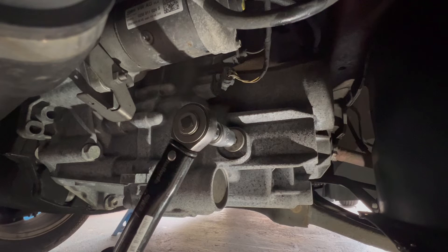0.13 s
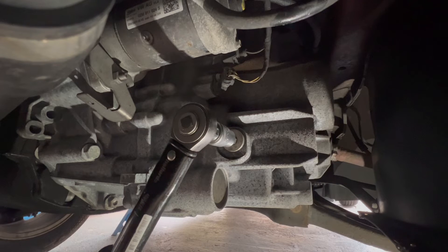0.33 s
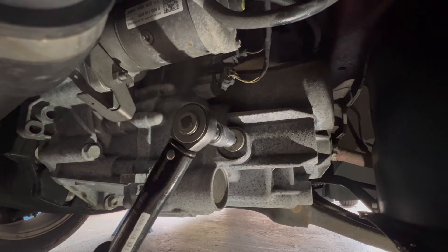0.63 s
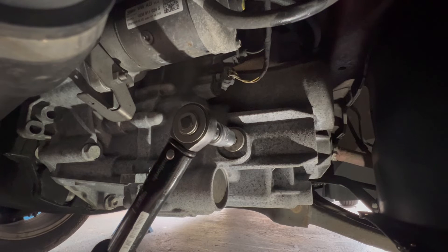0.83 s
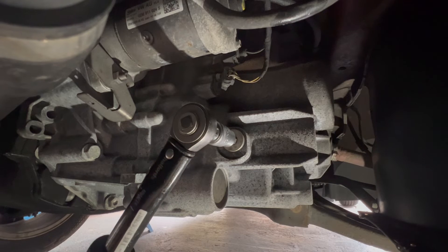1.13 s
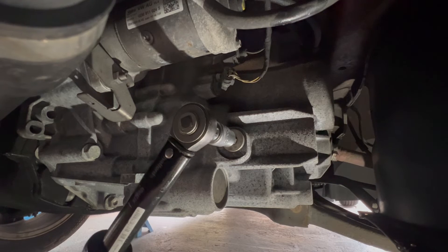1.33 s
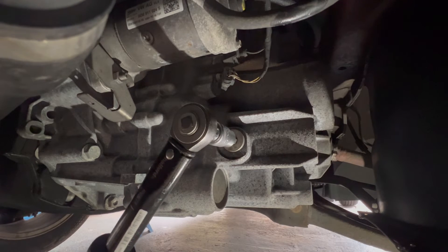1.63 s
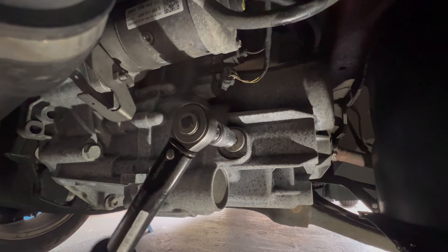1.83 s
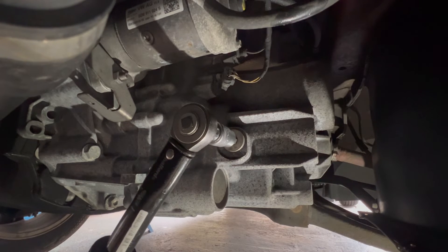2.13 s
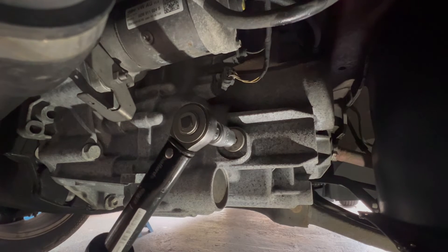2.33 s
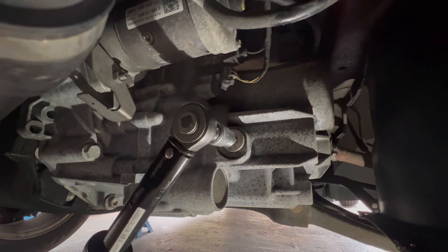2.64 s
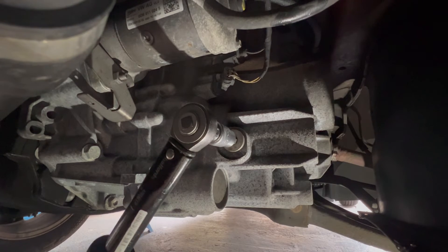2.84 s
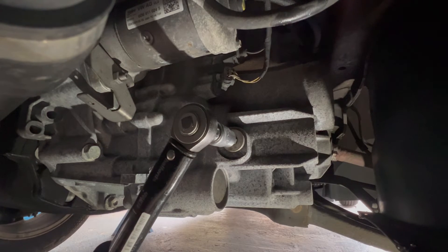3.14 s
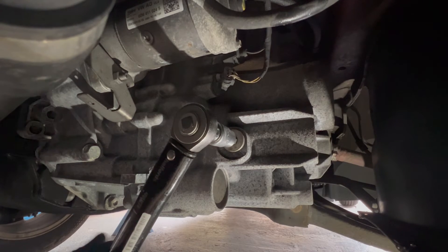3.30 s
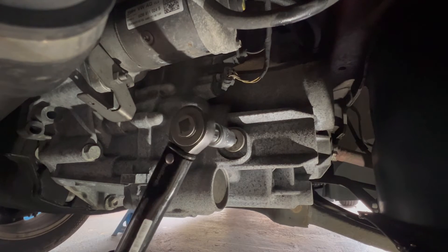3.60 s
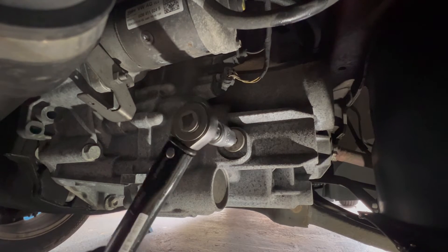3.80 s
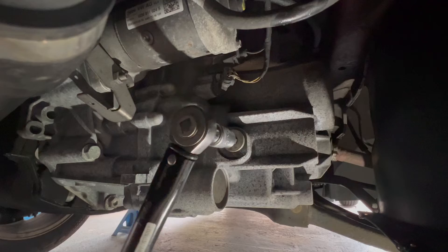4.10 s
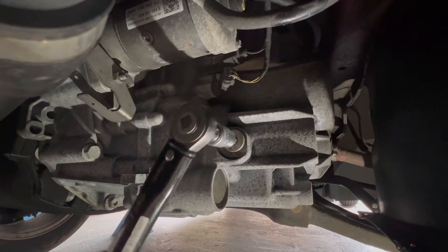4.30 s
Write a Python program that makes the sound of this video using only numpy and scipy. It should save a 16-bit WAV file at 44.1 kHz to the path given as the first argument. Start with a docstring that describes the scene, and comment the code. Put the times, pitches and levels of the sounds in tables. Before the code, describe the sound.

A torque wrench gives four sharp, ringing metal clicks, followed by light tool handling ticks, over a low garage hum.

```python
"""A click-type torque wrench breaks over and resets twice on a plug under a vehicle in a garage.
Each blow is a short rattle of steel that rings the bar and the underbody, then comes back to the
stereo microphone from floor and walls. Hand and sleeve tick and rub on the tool.
Behind them lie a low, lumpy hum and a band of distant hiss."""
import sys
import numpy as np
from scipy import signal
from scipy.fft import rfft, irfft
from scipy.io import wavfile
from scipy.ndimage import uniform_filter1d

SR = 44100
rng = np.random.default_rng(int(sys.argv[2]) if len(sys.argv) > 2 else 0)


def log_audio(samples):
    """Write samples as a 16-bit WAV file to the path given in sys.argv[1]."""
    # one column per channel
    frames = np.atleast_2d(samples).T
    # limit to full scale, then quantise
    limited = np.clip(frames, -1, 1)
    pcm = np.round(limited * 32767).astype(np.int16)
    wavfile.write(sys.argv[1], SR, pcm)


N = 196588

# Blows of the pawl, under the vehicle: start_s, rattle_db, is_reset (0 = break over), return_db
PAWL_BLOWS = [(1.2875, -18.5, 0, -20.5), (1.8451, -18.5, 1, -21), (2.3753, -18, 0, -20),
              (2.8758, -18.5, 1, -21.5)]


def wrench():
    """Each blow of the pawl rattles the head, rings the steel and sounds the garage."""
    out, t = np.zeros((2, N)), np.arange(SR // 2) / SR
    for start_s, rattle_db, is_reset, return_db in PAWL_BLOWS:
        add(out, start_s, gain_of(rattle_db) * head_rattle(t[:2048], is_reset))
        add(out, start_s, gain_of(return_db) * (steel_ring(t, is_reset) + garage_return(t, is_reset)))
    return out


# Colour of the break-over and of the reset at the microphone: freq_hz, left_db, right_db
BREAK_COLOUR = [(199.5, -71.5, -70), (448, -69, -51.5), (738, -78, -55), (1300, -46, -63),
                (2000, -46.5, -50.5), (2580, -51.5, -56), (3380, -43, -48), (5800, -51, -47),
                (7500, -47, -50), (9100, -53.5, -47.5), (11600, -41.5, -41.5), (13000, -39, -39.5),
                (16500, -46, -41)]
RESET_COLOUR = [(200, -87, -70.5), (450, -67, -58), (720, -64.5, -51.5), (1330, -53, -59.5),
                (1950, -50, -51), (2750, -52, -51.5), (3595, -50, -65), (5140, -53, -61), (6840, -52, -54),
                (9000, -51.5, -52.5), (11760, -36, -37), (12640, -60.5, -58), (15450, -44.5, -57)]


def head_rattle(t, is_reset, clack_db=-2.5, chatter_db=0.5):
    """Steel meets steel: a treble snap bounces once; the head's clack builds for 2 ms and dies."""
    colour = RESET_COLOUR if is_reset else BREAK_COLOUR
    chatter = gain_of(chatter_db * wander(1800, len(t)))
    noise = stereo_noise(len(t), lambda hz: read(colour, hz), chatter)
    low, high = split(noise, hz=7500)
    bounce = .45 * np.exp(-abs(t - .0022) / .0009)
    snap = np.exp(-t / .0009) + bounce + .15 * np.exp(-t / .004)
    clack = t / .0017 * np.exp(1 - t / .0017)
    attack = np.minimum(t / .0001, 1)
    return unit_rms(unit_rms(high * snap * attack) + gain_of(clack_db) * unit_rms(low * clack))


# Modes of the bar and the underbody above it, levels against the garage's return:
# pitch_hz, level_db, t60_s, left_minus_right_db, reset_change_db, right_lead_rad
STEEL_MODES = [(212.5, -5.5, 0.076, -1, -2.5, 0.56), (731, -14.5, 0.045, -12.5, 3, 1.66),
               (969, -18, 0.17, -5, -3, 1.35), (1219, -19.5, 0.072, -4, 4, 2.5),
               (1295, -11, 0.09, -6.5, 3, 1.3), (1423, -7.5, 0.04, -6, 2, 1.04),
               (1794, -17, .12, -4.5, 3, 1.76), (1845, -21, 0.34, -6, 5, 1.9),
               (1901, -14, 0.095, -7.5, 4.5, 1.63), (1987, -3.5, 0.018, -12, 4.5, 1.62),
               (2294, -15, 0.13, -1.5, 5.5, 0.91), (2610, -21, 0.14, -6, -0.5, 2.6),
               (3042, -10.5, 0.068, 0.5, 1, 1.4), (3500, -12, 0.095, -0.5, -1, 0.71),
               (3570, -3.5, 0.034, 7.5, -5, .8), (3970, -16, 0.13, -0.5, -5, 1.5),
               (4200, -14, .1, 5, -4.5, 0.89), (4500, -6, 0.049, 6, -2.5, 1.4),
               (4944, -14, .12, 5.5, -1, 0.9), (5140, -22.5, 0.1, 3.5, -3, 1.9),
               (5490, -4.5, 0.076, 1.5, -5.5, 1.2), (5850, -7, 0.062, 3.5, -4.5, 0.9)]


def steel_ring(t, is_reset):
    """Bar and underbody ring, each mode building over a few cycles; near surfaces echo them."""
    direct = np.zeros((2, len(t)))
    for hz, db, t60_s, pan_db, reset_db, lead_rad in STEEL_MODES:
        phase = np.array([[0], [lead_rad]]) + 2 * np.pi * rng.random()
        build = 1 - np.exp(-(t * hz / 1.72) ** 2)
        level_db = db + is_reset * reset_db - 60 * t / t60_s + [[pan_db / 2], [-pan_db / 2]]
        direct += gain_of(level_db) * build * np.sin(2 * np.pi * hz * t + phase)
    out = direct.copy()
    for delay_s, echo_db in [(.0105, 0.5), (.0138, -11), (.0185, -7)]:
        add(out, delay_s, gain_of(echo_db) * direct)
    return out


# Colour of what the garage sends back to the microphone: freq_hz, left_db, right_db
GARAGE_COLOUR = [(201.8, -57, -54), (580, -72, -68), (1310, -60.5, -60.5), (2010, -68.5, -54.5),
                 (2700, -58.5, -65), (3630, -64, -65), (5464, -59.5, -70.5), (7200, -65, -67),
                 (9000, -65, -66.5), (11200, -71, -70), (13080, -71.5, -68), (15400, -76.5, -86.5)]
# Decay of the garage by band: freq_hz, t60_s
GARAGE_DECAY = [(200, 0.14), (900, 0.18), (2000, 0.2), (4500, 0.3), (9000, 0.2), (15000, 0.25)]


def garage_return(t, is_reset):
    """Floor, underbody and walls return the blow: it swells, then each band dies at its own speed."""
    def colour(hz):  # the reset is a duller blow
        return read(GARAGE_COLOUR, hz) - is_reset * 7.6 * band(hz, centre_hz=5200)
    hz, frame_s, spectrum = signal.stft(stereo_noise(len(t), colour), SR, nperseg=256)
    lumps = unit_rms(uniform_filter1d(rng.standard_normal(spectrum.shape[1:]), 5, 0))  # uneven surfaces
    decay_db = 60 * frame_s / read(GARAGE_DECAY, hz).T
    tail = signal.istft(spectrum * gain_of(0.62 * lumps - decay_db), SR, nperseg=256)[1]
    swell = 1 - np.exp(-(t / .008) ** 2)
    return tail[:, :len(t)] * swell


# Handling of the tool: start_s, snap_db, knock_db, knock_hz, left_minus_right_db
HANDLING_TICKS = [(.4547, -51, -60, 4800, 2), (.506, -72, -52, 4420, 14), (0.543, -66, -52, 4700, 9),
                  (.8, -75, -42, 1170, 3), (0.9485, -72, -56.5, 4570, 9), (1.181, -59, -52, 4800, 5),
                  (2.309, -72, -57, 4570, 7), (2.7652, -69, -36, 1410, 4), (3.422, -66, -37, 2700, -2),
                  (3.445, -65, -42.5, 1290, -3), (3.5215, -49.5, -53, 4500, -2),
                  (3.525, -62, -38, 1170, -7), (3.743, -54, -48, 3800, 1), (3.783, -42, -57, 4000, -3),
                  (3.8255, -41.5, -52, 5000, 2), (3.8429, -37, -41, 870, -4.5), (3.850, -40, -47, 4500, 1),
                  (3.855, -45, -50, 4500, 7), (3.8874, -25.5, -26, 2920, 2), (3.962, -39.5, -42, 3560, 0),
                  (4.001, -39, -44.5, 3540, 1), (4.037, -47, -58, 5000, 0), (4.232, -62, -44, 800, 4),
                  (4.353, -60, -45, 1750, -10), (4.372, -47, -35.5, 1500, -4),
                  (4.4053, -30, -39, 4060, 0.5), (4.408, -60, -38.5, 1370, -4.5),
                  (4.444, -44, -46, 4000, 5), (4.448, -37, -41, 3520, -4)]
SNAP_HZ, SNAP_OCTAVES, SNAP_DECAY_S = 11450, 0.81, 0.0033
KNOCK_OCTAVES, KNOCK_DECAY_S = 0.63, 0.0036


def handling_ticks():
    """Each tick of the handled tool is a bright snap and a duller knock, with a faint return."""
    out, t = np.zeros((2, N)), np.arange(4096) / SR
    attack = np.minimum(t / 0.000067, 1)
    for start_s, snap_db, knock_db, knock_hz, pan_db in HANDLING_TICKS:
        snap = (snap_db, SNAP_HZ, SNAP_OCTAVES, SNAP_DECAY_S)
        knock = (knock_db, knock_hz, KNOCK_OCTAVES, KNOCK_DECAY_S)
        sides_db = np.array([[pan_db / 2], [-pan_db / 2]])
        for db, centre_hz, octaves, decay_s in (snap, knock):
            colour = lambda hz: np.maximum(-6 * (np.log2((hz + 1) / centre_hz) / octaves) ** 2, -60)
            decay = np.exp(-t / decay_s) + 0.087 * np.exp(-t / 0.018)
            add(out, start_s, gain_of(db + sides_db) * stereo_noise(len(t), colour) * decay * attack)
    return out


# Colour of the rubbing at the microphone: freq_hz, left_db, right_db
SLEEVE_COLOUR = [(2740, -80.5, -79), (3624, -84, -100), (5247, -82, -103), (6920, -91, -88),
                 (9550, -84.5, -90.5), (11100, -105.5, -97.5), (13340, -86, -90), (15600, -120, -94.5)]
# Strokes of cloth and hand: start_s, length_s, level_db, extra_treble_db
SLEEVE_STROKES = [(-.03, .08, -50.5, -7), (0.387, .2, -67, -9), (1.386, 0.32, -62, -10),
                  (1.644, 0.26, -56, -8), (2.187, 0.35, -65.5, -9), (2.9, 0.14, -57, 3),
                  (3.061, 0.037, -57, 13.5), (3.101, 0.086, -62, 20.5), (3.245, 0.11, -65.5, 13.5),
                  (3.346, 0.035, -49, 0), (3.382, 0.16, -61, -7), (3.754, .014, -46.5, 16),
                  (3.736, 0.065, -62, 10), (3.84, 0.23, -61.5, 2), (4.138, 0.16, -69, 9.5),
                  (4.33, .2, -60, 1.5)]
RISE, FALL = .15, 0.59  # shares of a stroke's length
REST_DB, REST_TREBLE_DB = -72, -3  # the hand resting on the grip


def sleeve_rub():
    """Cloth and hand slide: grainy hiss rises, holds and fades, with sparse crackles of the weave."""
    t = np.arange(N) / SR
    low_gain, high_gain = gain_of(REST_DB), gain_of(REST_DB + REST_TREBLE_DB)
    for start_s, length_s, db, treble_db in SLEEVE_STROKES:
        progress = (t - start_s) / length_s
        fade = np.exp(-(np.maximum(progress - 1 + FALL, 0) / FALL) ** 2)
        stroke = np.clip(progress / RISE, 0, 1) * fade
        low_gain = low_gain + gain_of(db) * stroke
        high_gain = high_gain + gain_of(db + treble_db) * stroke
    colour = lambda hz: read(SLEEVE_COLOUR, hz) - 16 * np.maximum(np.log2(2500 / (hz + 1)), 0)
    low, high = split(stereo_noise(N, colour), hz=8500)
    grain_db = 2.17 * wander(142) + 1.42 * wander(35)
    snags = (rng.random(N) < 15 / SR) * rng.exponential(.4, N)  # about 15 a second
    crackles = signal.lfilter([1], [1, -.99], snags)
    return (low_gain * low + high_gain * high) * gain_of(grain_db) * (1 + crackles)


# Colour of the garage's hum and distant hiss: freq_hz, left_db, right_db
ROOM_COLOUR = [(19.9, -100, -100), (53, -59.5, -60), (155.2, -66.5, -69.5), (267, -83, -76),
               (580, -87, -86.5), (1230, -82.5, -84.5), (1890, -77, -91), (2110, -77.5, -93.5),
               (2840, -99, -102), (4650, -96.5, -110), (5640, -104, -112), (7280, -94.5, -113),
               (9200, -111, -114), (15500, -118, -119)]
# Lift of the hum near 135 Hz over the rest: time_s, lift_db
HUM_LIFT = [(0, 7), (2.4, 3.5), (3.1, 2), (4.46, 2)]
ROOM_DB = -43.5


def room_tone():
    """Low hum and distant hiss drift in patches; part of the hum sinks over time."""
    noise = stereo_noise(N, lambda hz: read(ROOM_COLOUR, hz))
    hz, frame_s, spectrum = signal.stft(noise, SR, nperseg=2048)
    speckle = rng.standard_normal(spectrum.shape[1:])
    patches = unit_rms(uniform_filter1d(uniform_filter1d(speckle, 16, 0), 6, 1))
    drift_db = 2.17 * patches * np.minimum(hz / 600, 1)[:, None]
    hum_db = band(hz, centre_hz=135)[:, None] * np.interp(frame_s, *np.transpose(HUM_LIFT))
    tone = signal.istft(spectrum * gain_of(drift_db + hum_db), SR, nperseg=2048)[1]
    return gain_of(ROOM_DB) * tone[:, :N]


# How alike the left and right channels sound, and their phase: freq_hz, likeness (0-1), right_lead_rad
STEREO_IMAGE = [(60, .94, .1), (200, .93, .4), (450, .75, .9), (1000, .4, 3.3), (2500, .4, 2.8),
                (5500, .3, 2.6), (8500, .3, 1.5), (10000, .8, 3.0), (11100, .97, 3.3), (12100, .8, 4.9),
                (12900, .99, 6.3), (14500, .97, 6.5), (15300, .7, 7.5), (16000, .7, 9.0)]


def stereo_noise(size, colour_db, flutter=1):
    """Coloured noise of rms 1: the right channel shares the left's, turned in phase, plus its own."""
    hz = np.fft.rfftfreq(size, 1 / SR)
    likeness, lead_rad = read(STEREO_IMAGE, hz)
    left, own = rfft(rng.standard_normal((2, size)) * flutter)
    right = likeness * np.exp(1j * lead_rad) * left + np.sqrt(1 - likeness ** 2) * own
    return unit_rms(irfft(np.array([left, right]) * gain_of(colour_db(hz)), size))


def gain_of(db):
    """Decibels to gain."""
    return 10 ** (np.asarray(db) / 20)


def unit_rms(x):
    """Scales to rms 1."""
    return x / np.sqrt(np.mean(x ** 2) + 1e-20)


def read(table, hz):
    """A table's columns at hz, joined on a log axis."""
    freq_hz, *columns = np.transpose(table)
    return np.array([np.interp(np.log(hz + 1), np.log(freq_hz + 1), c) for c in columns])


def band(hz, centre_hz):
    """A bell about an octave wide."""
    return np.exp(-(np.log2((hz + 1) / centre_hz) / .5) ** 2)


def add(mix, start_s, sound):
    """Mixes a sound in at start_s."""
    part = mix[:, round(start_s * SR):][:, :sound.shape[1]]
    part += sound[:, :part.shape[1]]


def wander(rate_hz, size=N):
    """Random drift of rms 1, up to about rate_hz."""
    width = int(SR / rate_hz)
    return unit_rms(uniform_filter1d(uniform_filter1d(rng.standard_normal(size), width), width))


def split(x, hz):
    """The parts below and above hz."""
    low = signal.sosfiltfilt(signal.butter(2, hz, fs=SR, output="sos"), x)
    return low, x - low


def scene():
    """Wrench, handling and garage at the microphone."""
    return wrench() + handling_ticks() + sleeve_rub() + room_tone()


def record(dry):
    """Peaks clip at full scale; then the treble above 16.2 kHz is cut."""
    lowpass = signal.firwin(511, 16200, window=("kaiser", 9), fs=SR)
    return signal.oaconvolve(np.clip(dry, -1, 1), lowpass[None], "same")


dry = scene()
out = record(dry)
log_audio(out)
```